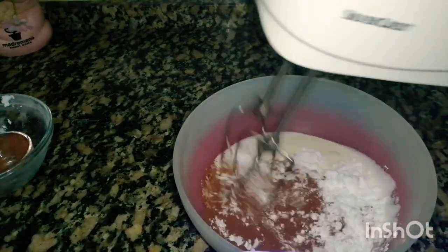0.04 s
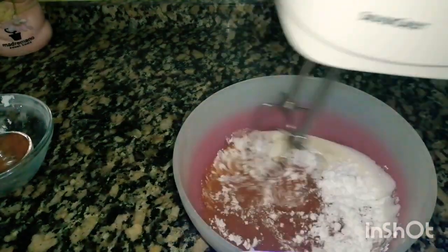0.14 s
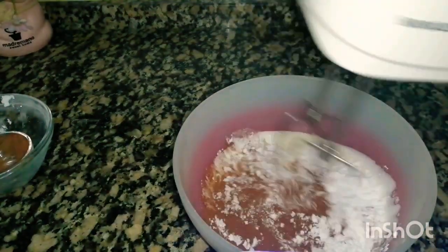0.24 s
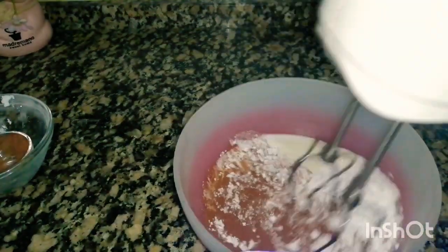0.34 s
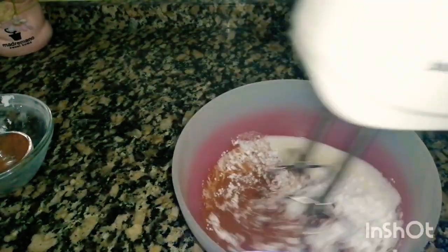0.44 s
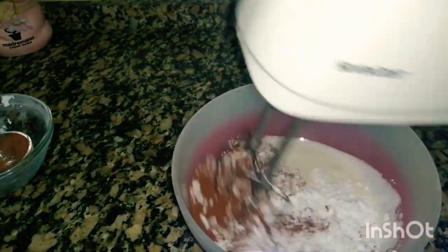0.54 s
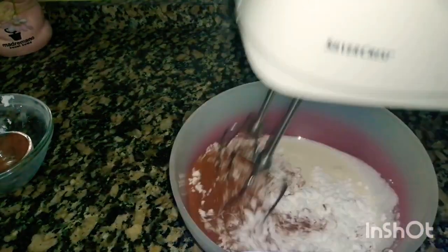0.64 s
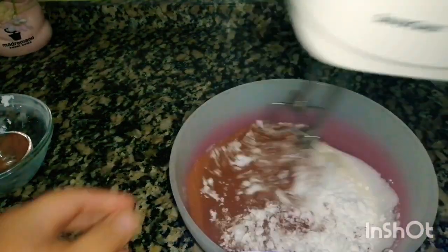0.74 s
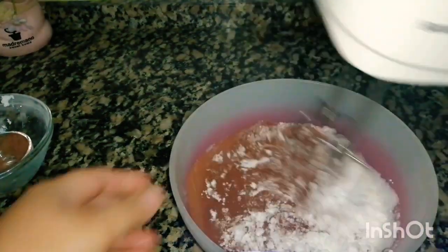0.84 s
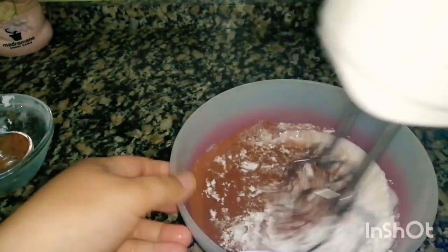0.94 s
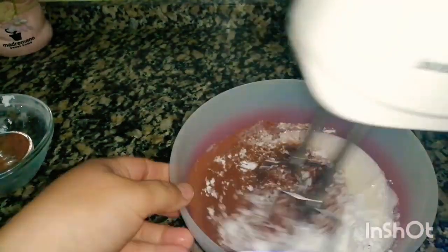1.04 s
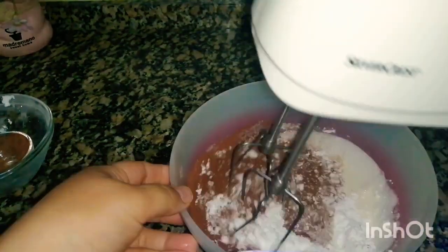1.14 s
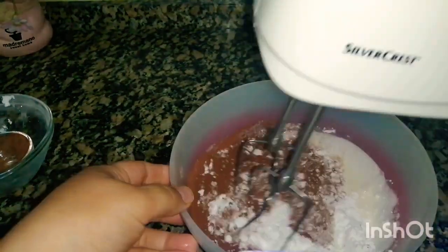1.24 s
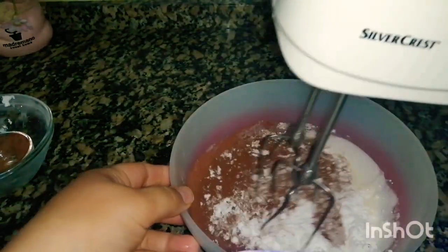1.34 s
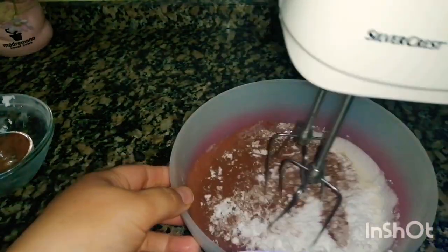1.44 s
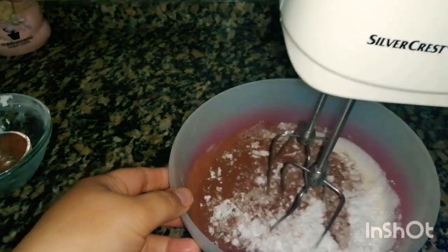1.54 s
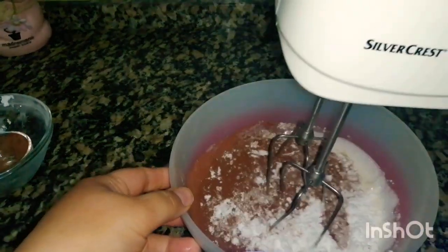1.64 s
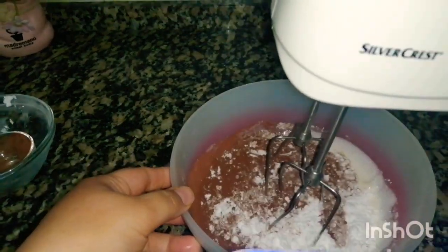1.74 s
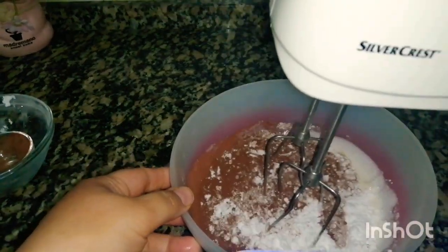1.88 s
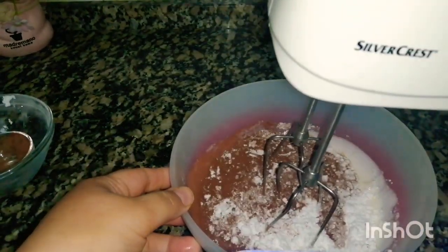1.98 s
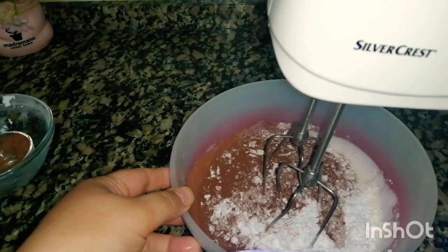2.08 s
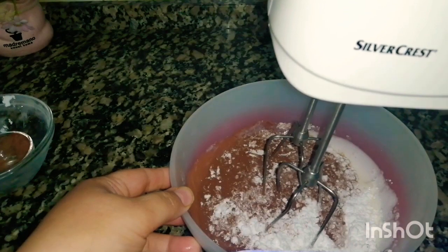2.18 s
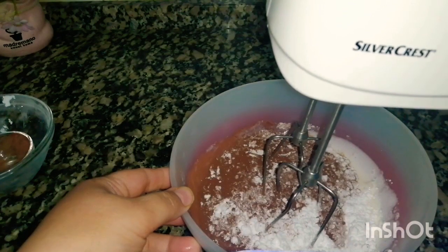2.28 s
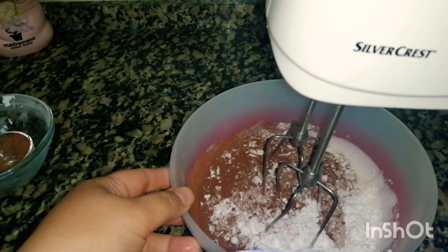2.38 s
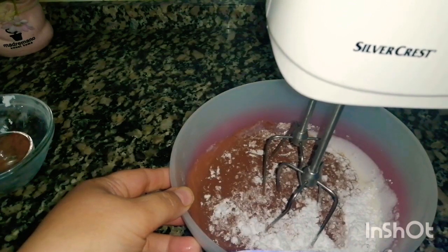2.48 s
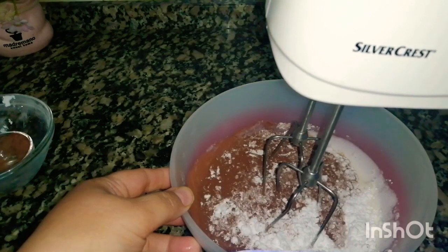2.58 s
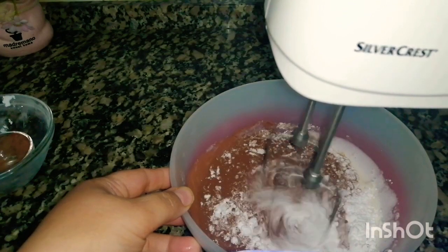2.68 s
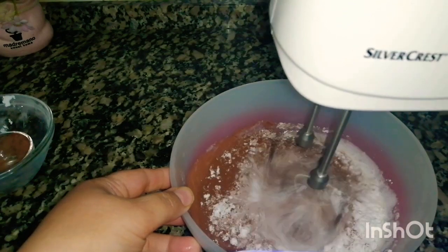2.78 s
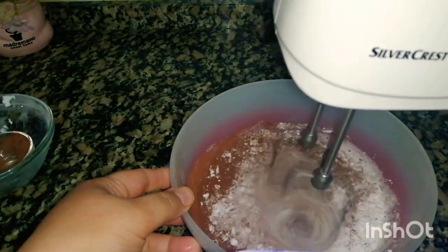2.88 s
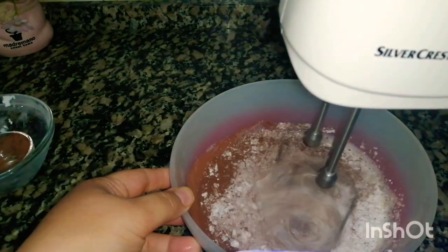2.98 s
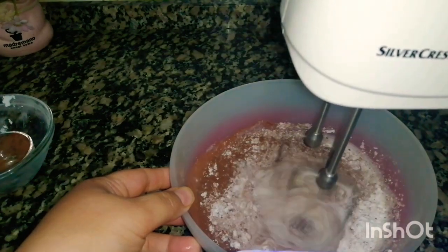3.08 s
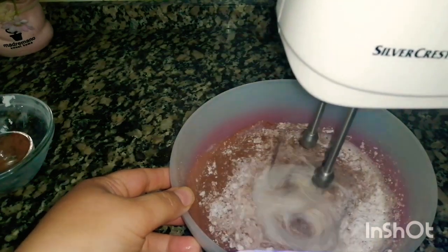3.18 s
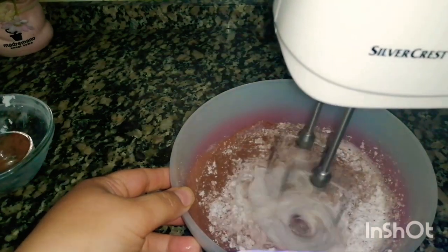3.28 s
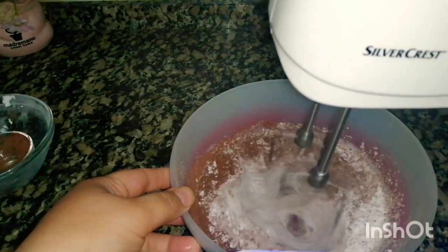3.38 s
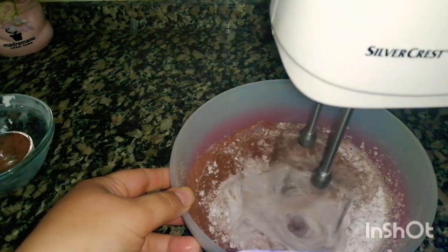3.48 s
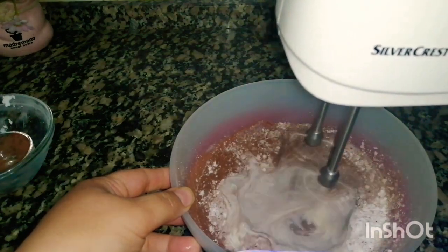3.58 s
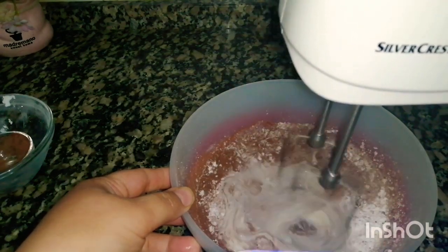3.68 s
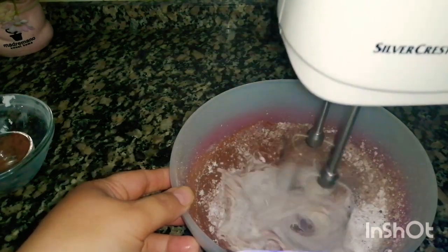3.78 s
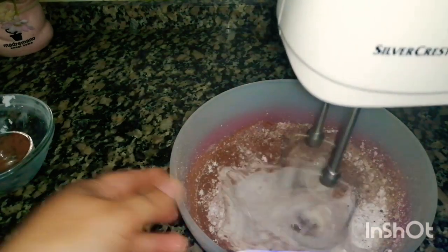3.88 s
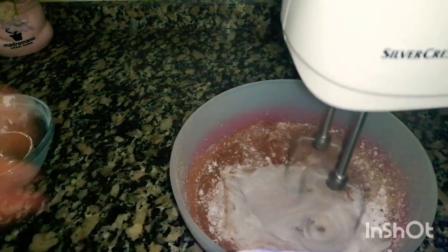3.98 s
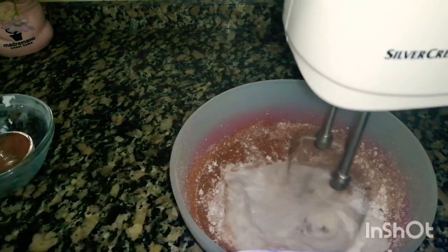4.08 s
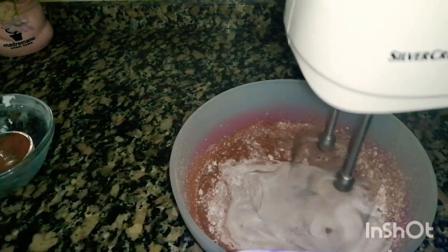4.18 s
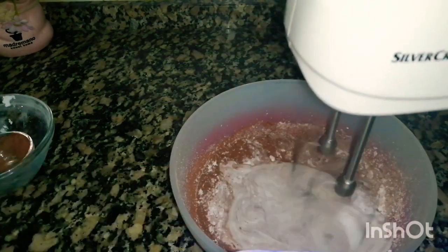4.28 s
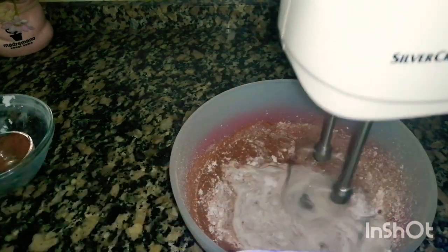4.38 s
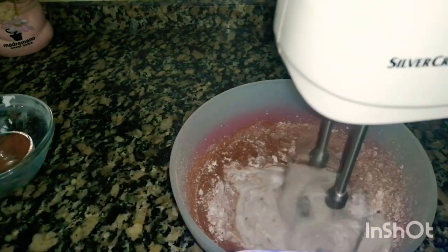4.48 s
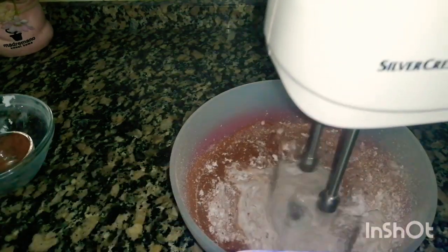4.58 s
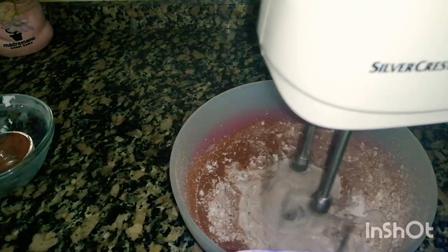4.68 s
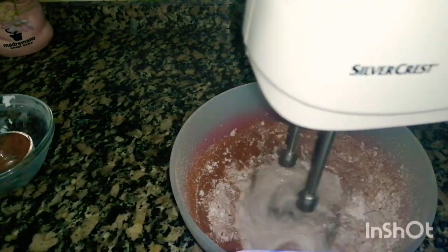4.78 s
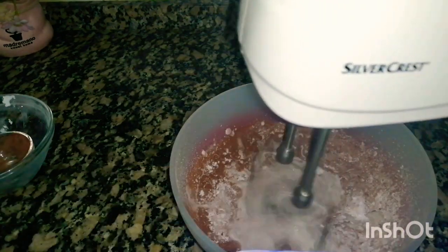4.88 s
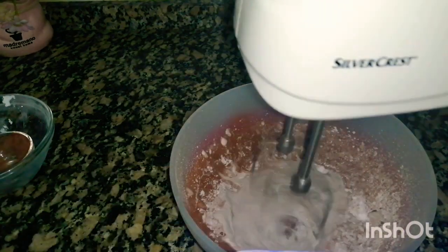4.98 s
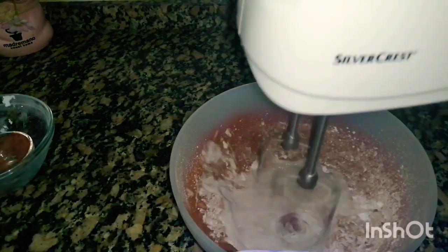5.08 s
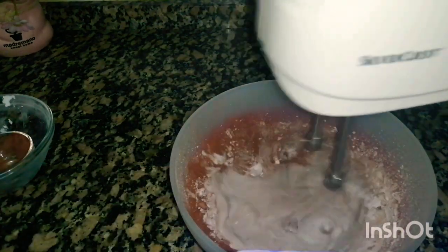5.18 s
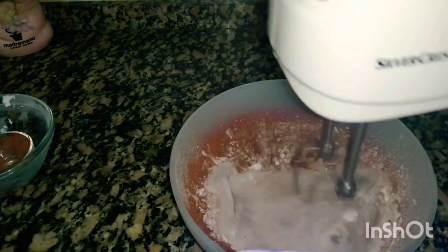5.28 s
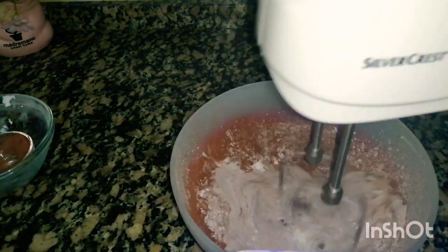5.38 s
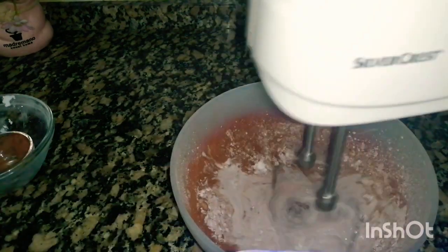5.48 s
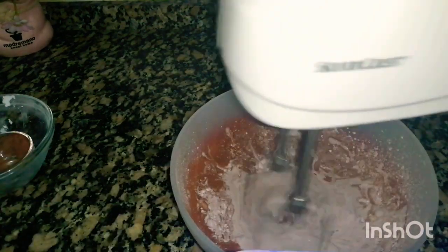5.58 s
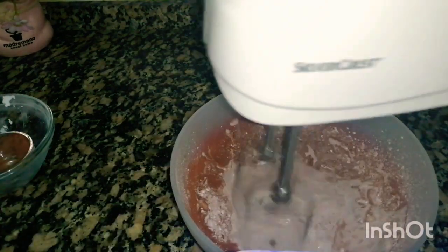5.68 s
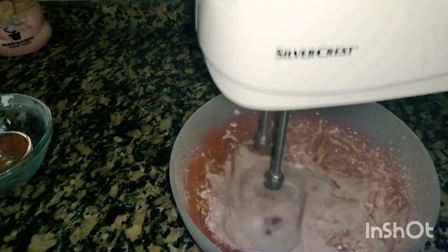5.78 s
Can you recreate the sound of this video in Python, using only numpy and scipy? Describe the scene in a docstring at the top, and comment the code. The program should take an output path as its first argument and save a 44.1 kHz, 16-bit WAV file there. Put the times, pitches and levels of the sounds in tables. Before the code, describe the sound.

After light scrapes and knocks against a bowl, a hand mixer starts with a rising whine and runs, rattling and hissing through cream.

```python
"""Hand mixer whipping cream

In a small kitchen, idle beaters are stirred through cocoa and powdered sugar and knock on a plastic
bowl. The switch clicks and the electric motor whines up to speed: its gears rattle, the beaters hiss
through the cream and fling it at the wall, and the bowl bumps on the counter. The left microphone
opening is muffled, and only that side picks up the deep shaking of the counter."""
import sys
import numpy as np
from scipy import signal
from scipy.fft import rfft, irfft, next_fast_len
from scipy.io import wavfile

SR = 44100
rng = np.random.default_rng(int(sys.argv[2]) if len(sys.argv) > 2 else 0)


def generate_wav(signal):
    """Clip the signal to [-1, 1] and save it as 16-bit WAV at the path in sys.argv[1]."""
    frames = np.transpose(np.atleast_2d(signal))
    scaled = np.clip(frames, -1, 1) * 32767
    pcm = np.round(scaled).astype(np.int16)
    wavfile.write(sys.argv[1], SR, pcm)


N = 257103
TIME = np.arange(N) / SR
FFT_SIZE = next_fast_len(N + SR, real=True)
FREQS = np.maximum(np.arange(FFT_SIZE // 2 + 1) * SR / FFT_SIZE, 1)

# Levels in the tables are relative: each sound is scaled again when it is mixed.
# tones of the rotor, the motor's spinning part (multiple of its speed, level [dB])
ROTOR_TONES = [(2, -12.5), (3, 0.3), (4, -10), (5, -5.5), (6, -9.5), (8, -5), (9, -2), (22, -24), (27, -2)]
POLE_TONES = [(2, 0.5), (4, -14), (5, -13.5), (6, -12.5)]   # buzz of the two magnetic poles
BRUSH_TONES = [(24, 0), (48, -1), (72, -3)]   # brushes sliding over 24 contact bars
# hum of the unbalanced rotor (speed [turns/s], level [dB])
UNBALANCE_HUM = [(100, -71), (150, -54), (200, -37), (268, -22), (367, -25)]
# tone colours: how strong each pitch is (frequency [Hz], level [dB])
SHELL_COLOUR = [(100, -17.5), (140, -20.5), (220, -15.5), (310, 1), (520, -2), (720, -5.5), (1000, -0.8),
                (2300, -5), (3200, -1), (4000, -13), (5400, -2.5), (6800, -1.5), (8000, -15.5),
                (11000, -19.5), (15000, -10.5), (15600, -8.5)]   # the mixer's outer case
FRAME_COLOUR = [(700, -40), (1800, -47), (3300, -45), (4200, -58), (5500, -37), (6800, -39), (7500, -48),
                (8000, -52), (9000, -48), (9600, -42), (13000, -42), (15000, -44)]   # the motor's frame
BOWL_COLOUR = [(35, -36), (60, -9), (149, 1), (238, -5), (437, -6), (882, -8.5), (1010, -11), (1310, -8.5),
               (2050, -20), (3270, -5), (3940, -16.5), (6000, -4.5), (7940, -21), (14900, -36),
               (16000, -13)]   # the knocked bowl
POWDER_COLOUR = [(35, -17), (60, -24), (81, -1.5), (408, 6.5), (1010, -5.5), (1510, -9), (1660, -12),
                 (2580, -5.5), (4030, -14.5), (6430, -4), (8710, -23), (14900, -20.5), (16000, -23)]   # stirred powder
BUMP_COLOUR = [(50, -26), (95, 0.5), (130, -2), (190, -2.5), (280, -14), (600, -35), (2000, -70)]   # bowl on counter
SLOP_COLOUR = [(150, -25), (350, -4), (520, -0.5), (900, -8), (2000, -17), (8000, -40)]   # flung cream
ROOM_COLOUR = [(12, -28), (20, 2.5), (58, -18), (127, -19), (177, -22.5), (301, -18.5), (849, -31.5),
               (3840, -42.5), (5230, -39.5), (7730, -46), (12400, -49), (14700, -29), (16000, -40)]   # the still kitchen
MUFFLED_COLOUR = [(60, -17.5), (130, 5), (200, -4.5), (300, -10), (550, -13), (750, -3), (1100, 1),
                  (1400, -13.5), (2400, -18.5), (3000, -15.5), (4000, -22.5), (4600, -30), (6500, -48.5),
                  (15000, -38)]   # the left side compared with the right
GROWL_COLOUR = [(200, -22), (400, -10.5), (470, -5), (580, 3.0), (700, -22), (1500, -28)]
RUMBLE_COLOUR = [(12, -28), (28, 3.0), (40, -11), (50, -11), (63, -20), (90, -16), (200, -63),
                 (1000, -106)]
# resonances: narrow bands that a part boosts or weakens (frequency [Hz], width [Hz], boost [dB])
SHELL_RESONANCES = [(304.3, 21.6, 9.5), (484, 130, 6), (563.8, 13.3, 11.5), (820, 80, 4.5), (901, 30, 5),
                    (1292, 36, 2), (1836, 85, 1.5), (3050, 60, -3), (3200, 47, 5), (5320, 80, 3.5)]
FRAME_RESONANCES = [(1400, 280, 19), (2200, 220, 11), (2670, 320, 16.8), (3100, 420, 17.6), (4700, 200, 12),
                    (5610, 260, 13), (6440, 240, 14.3)]
HUM_RESONANCES = [(307.4, 19, 9.5), (318.2, 3.9, -5), (327, 10, 4.5), (337.5, 7.7, -7.5)]
BOWL_RESONANCES = [(312, 18, 11.2), (447, 100, 6.3), (568, 21, 8.4), (866, 23, 7.3), (1350, 160, 2.7),
                   (1900, 100, 4.6), (2615, 57, 5.3), (3290, 54, 5.5), (4560, 110, 5.2), (5320, 150, 6.1)]
# ringing of the wire beaters and their mount (frequency [Hz], level [dB], time to fade 60 dB [s])
BEATER_NOTES = [(322, 1, 0.35), (530, -6, 0.48), (2230, 6, 0.13), (2670, -8, 0.7), (2950, -12, 0.43),
                (3400, -2, 0.25), (4560, -25, 0.26), (5050, -46, 0.17), (5200, -4, 0.3), (6153, -30, 0.56)]
# sharp hits (time [s], level [dB], treble over bass [dB])
SWITCH_CLACKS = [(2.709, -22, 7.5), (2.729, -19, -19), (2.743, -9.5, 4), (2.754, -18.5, -15)]   # the switch, then the loose gears catching
BOWL_KNOCKS = [(0.198, -28, -10), (0.212, -30, 7.5), (0.219, -38, -18), (0.257, -34, -12), (0.366, -43, 7),
               (0.46, -39, -10), (0.473, -37, -21), (0.55, -43, 9), (0.636, -59, 0), (0.72, -34.5, 2),
               (0.847, -37, 7), (0.852, -32.5, 2), (1.057, -40.5, 18), (1.263, -28.5, 10),
               (1.269, -26.5, -2), (1.55, -49, 3), (1.611, -54.5, 0), (1.804, -60, 2), (1.98, -62, 8),
               (3.43, -28, -7)]   # beaters against the bowl
# strokes through the powder (time [s], length [s], crunch [dB], rubbing [dB], counter thump [dB])
POWDER_STROKES = [(0.0, .055, -68, -54.5, -63), (0.197, .08, -50.5, -40, -63), (0.31, .06, -53.5, -54, -64),
                  (0.457, 0.044, -57, -48.5, -58), (0.497, .03, -51, -53, -63), (0.533, .03, -47, -57, -70),
                  (0.634, 0.075, -43.3, -58, -57), (0.714, 0.081, -50, -46.5, -72),
                  (0.845, .05, -53.5, -53, -58), (1.054, 0.05, -43, -48, -60),
                  (1.259, .06, -55, -47.5, -53), (1.376, .07, -50, -58.5, -75),
                  (1.477, 0.13, -61.5, -59.5, -80), (1.98, .09, -73, -68.5, -72)]
# soft hits (time [s], level [dB])
BOWL_BUMPS = [(0.2, -55), (0.245, -54), (0.675, -55), (0.715, -53), (1.058, -53.5), (1.255, -56),
              (1.615, -65), (2.045, -58.5), (4.2, -40), (4.33, -42), (5.31, -47), (5.37, -38), (5.77, -44)]
CREAM_SLOPS = [(3.36, -27.5), (4.12, -26.5), (4.32, -27), (5.38, -28), (5.78, -30)]
# shaking of the counter under the whirling beaters (time [s], level [dB])
COUNTER_SHAKE = [(2.8, -91), (2.89, -66), (3.33, -52), (3.41, -66), (3.46, -55), (3.73, -53), (3.81, -41),
                 (4.41, -35.5), (5.1, -64), (5.32, -40), (5.5, -54), (5.61, -43.5), (5.83, -50)]

SWITCH_ON_S, MAINS_HZ, CUTOFF_HZ = 2.71, 50, 15700
GEAR_RATIO, ROTOR_SLOTS = 11.7, 12
# rotor speeds are in Hz, meaning turns per second
KICK_HZ, RACE_HZ, RACE_S = 20.3, 208.5, .177
CREEP_HZ, CREEP_S, CREEP_EASE = 138.3, 2.39, 1.706
# rattle, hiss and whistle grow with speed until they reach full strength
RATTLE_DB_PER_HZ, HISS_DB_PER_HZ, FULL_NOISE_HZ = .048, .075, 260
WHISTLE_DB_PER_HZ, FULL_WHISTLE_HZ = .2, 212
STROKE_RISE_S, STROKE_SAG_DB_PER_S, STROKE_FADE_DB_PER_S = 0.0074, 60, 192
ECHO_FADE_S = 0.51   # time to fade by 60 dB


def mixer():
    """Motor, gears and whisking sound through the shell; also returns the counter's shaking."""
    speed, age = rotor_speed(), since(SWITCH_ON_S)
    on = np.minimum(age / 0.016, 1)
    turns = np.cumsum(speed * (1 + .002 * drift(25))) / SR
    too_slow = np.maximum(FULL_NOISE_HZ - speed, 0)
    throb = np.cos(4 * np.pi * MAINS_HZ * TIME)   # the motor pulls twice per mains cycle
    strain = swell(SWITCH_ON_S, peak_s=0.03)   # the hard pull of starting up
    inside = motor_drone(speed, turns, throb, too_slow)
    outside = motor_whine(speed, turns, throb)
    inside += gears_and_whisking(turns, too_slow, strain) + starting_growl(age, strain, throb)
    clacks = from_db(-6.5) * blows(SWITCH_CLACKS, crack_s=0.0022, ring_s=0.01, ring_db=-22)
    shell = apply_filter(on * inside + clacks, unit_power(colour(SHELL_COLOUR, SHELL_RESONANCES)))
    slap, shake = whirling_beaters(turns / GEAR_RATIO)
    return shell + on * (outside + slap), on * shake


def rotor_speed():
    """Turns per second: the rotor jumps, races up, then creeps to top speed as the cream loosens."""
    age = since(SWITCH_ON_S)
    race = RACE_HZ * (1 - np.exp(-age / RACE_S))
    creep = CREEP_HZ * (1 - np.maximum(1 - age / CREEP_S, 0) ** CREEP_EASE)
    return KICK_HZ + race + creep


def motor_drone(speed, turns, throb, too_slow):
    """Inside the shell, the magnetic poles buzz and the spinning rotor drones."""
    current_db = -18 * np.clip((speed - 260) / 90, 0, 1)   # a fast motor draws less current
    buzz = from_db(current_db - 35.5) * np.clip(speed / 232, 0, 1) ** 5 * (1 + 0.82 * throb)
    buzz *= tones(POLE_TONES, turns, flutter=0.27, flutter_hz=24.7)
    drone = from_db(-35.6 - RATTLE_DB_PER_HZ * too_slow) * (speed / speed.max()) ** 3
    drone *= tones(ROTOR_TONES, turns, flutter=0.35, flutter_hz=45)
    return buzz + drone


def motor_whine(speed, turns, throb):
    """The unbalanced rotor hums, its slots whine and the brushes whistle; each flares at resonances."""
    def frame_gain(multiple):
        return from_db(level_at(multiple * speed, FRAME_COLOUR, FRAME_RESONANCES))

    hum = from_db(level_at(speed, UNBALANCE_HUM, HUM_RESONANCES)) * np.sin(2 * np.pi * turns)
    hum *= 1 + 0.14 * drift(19)
    whine = tones([(ROTOR_SLOTS, 0)], turns, flutter=.42, flutter_hz=65)
    whine *= frame_gain(ROTOR_SLOTS) * (1 + .85 * throb)
    whistle = sum(frame_gain(multiple) * tones([(multiple, db)], turns, flutter=0.27, flutter_hz=45)
                  for multiple, db in BRUSH_TONES)
    whistle *= (1 + 0.2 * throb) * from_db(-WHISTLE_DB_PER_HZ * np.maximum(FULL_WHISTLE_HZ - speed, 0))
    return hum + whine + whistle


def gears_and_whisking(turns, too_slow, strain):
    """Loose gears rattle, and grind at the start, while the whisked cream hisses."""
    chatter = 1 + 0.13 * np.cos(2 * np.pi * turns)   # once per rotor turn
    slaps = 1 + 0.031 * np.cos(4 * 2 * np.pi * turns / GEAR_RATIO)   # four per beater turn
    flicker = from_db(0.98 * drift(48) + 0.26 * drift(7))
    rattle = lows(grains(per_s=9000, spread_db=1.5), hz=2470)
    rattle *= from_db(-23.6 - RATTLE_DB_PER_HZ * too_slow) + from_db(-38) * strain
    hiss = highs(grains(per_s=25000, spread_db=3.0), hz=2430)
    hiss *= from_db(-22.3 - HISS_DB_PER_HZ * too_slow + .5 * drift(71))
    return chatter * slaps * flicker * (rattle + hiss)


def starting_growl(age, strain, throb):
    """The starting surge makes the shell growl, pulsing with the mains."""
    surge = (from_db(-18.5) * np.exp(-age / 0.75) + from_db(-14) * strain) * (1 + 0.42 * throb)
    return surge * apply_filter(rng.standard_normal(N), colour(GROWL_COLOUR))


def whirling_beaters(beater_turns):
    """Returns the low tones of blades slapping cream, and the deep shaking of the counter."""
    shake_db = np.interp(TIME, *np.transpose(COUNTER_SHAKE))
    slap = tones([(4, 2.5), (6, -1.5)], beater_turns, flutter=0.58, flutter_hz=24)
    shake = np.sin(2 * np.pi * beater_turns) + 0.34 * counter_rumble()
    return from_db(shake_db - 17.5) * slap, from_db(shake_db + 8.5) * shake


def stirring():
    """Idle beaters rub the bowl and crunch through powder; also returns the counter's late thumps."""
    crunch_gain = rub_gain = thump_gain = 0
    for start_s, length_s, crunch_db, rub_db, thump_db in POWDER_STROKES:
        age = since(start_s)
        # a stroke bites at once, weakens while it lasts, then dies away
        drop_db = STROKE_SAG_DB_PER_S * age + STROKE_FADE_DB_PER_S * since(start_s + length_s)
        push = np.minimum(age / STROKE_RISE_S, 1) * from_db(-drop_db)
        crunch_gain += from_db(crunch_db + 6.5) * push
        rub_gain += from_db(rub_db + 1) * push
        thump_gain += from_db(thump_db + 7) * swell(start_s, peak_s=0.073)
    powder = grains(per_s=2500, spread_db=2.7)
    drag = rub_gain * lows(powder, hz=1650) - crunch_gain * highs(powder, hz=1650)
    bowl = apply_filter(drag, unit_power(colour(POWDER_COLOUR, BOWL_RESONANCES)))
    return bowl, thump_gain * counter_rumble()


def beater_knocks():
    """The beaters hit the bowl: the plastic sounds, and the wire ticks and rings on."""
    knocks = highs(blows(BOWL_KNOCKS, crack_s=0.0028, ring_s=0.037, ring_db=-15.5), hz=210)
    bowl = apply_filter(knocks, unit_power(colour(BOWL_COLOUR, BOWL_RESONANCES)))
    tick = blows(BOWL_KNOCKS, crack_s=0.00067, ring_s=.004, ring_db=-22)
    return from_db(-0.5) * bowl + from_db(-39) * tick + from_db(-26) * wire_ring()


def wire_ring():
    """Each knock sets all the beaters' notes ringing, each with a slightly random strength."""
    out = np.zeros(N)
    starts = [round(knock[0] * SR) for knock in BOWL_KNOCKS]
    scatter_db = rng.normal(0, 1.4, (len(BOWL_KNOCKS), len(BEATER_NOTES)))
    strengths = from_db(np.array(BOWL_KNOCKS)[:, 1:2] + scatter_db)
    for (hz, db, fade_s), strength in zip(BEATER_NOTES, strengths.T):
        clicks = np.zeros(N) + 1e-18
        clicks[starts] = strength * from_db(db)
        decay, angle = np.exp(-np.log(1000) / (fade_s * SR)), 2 * np.pi * hz / SR
        # turns each click into a fading tone
        out += signal.lfilter([0, np.sin(angle)], [1, -2 * decay * np.cos(angle), decay ** 2], clicks)
    return out


def bumps_and_slops():
    """The jolted bowl bumps dully on the counter, and wet cream slops against its wall."""
    bumps = soft_hits(BOWL_BUMPS, BUMP_COLOUR, rng.standard_normal(N))
    return bumps + soft_hits(CREAM_SLOPS, SLOP_COLOUR, grains(per_s=1500, spread_db=2.5))


def counter_rumble():
    """Deep thudding noise carried by the counter."""
    return unit_power(apply_filter(rng.standard_normal(N), colour(RUMBLE_COLOUR)))


def kitchen_echo(x):
    """Dense early echoes from counter and tiles, then a short tail; weak in the bass."""
    age = TIME[:SR // 2]
    fade = np.exp(-np.log(1000) * age / ECHO_FADE_S) + 1.45 * np.exp(-age / 0.011)
    tail = rng.standard_normal(len(age)) * fade * (age > .001)
    return signal.fftconvolve(highs(x, hz=630), tail / np.sqrt(np.sum(tail ** 2)))[:N]


def room_noise():
    """The steady hush of the still kitchen, muffled on the left."""
    hush = apply_filter(rng.standard_normal((2, N)), unit_power(colour(ROOM_COLOUR)))
    hush[0] = apply_filter(hush[0], colour(MUFFLED_COLOUR))
    return hush


def tones(rows, turns, flutter, flutter_hz):
    """Tones at multiples of a turning speed, each fluttering in strength and phase."""
    out = np.zeros(N)
    for multiple, db in rows:
        wobble = 1 + flutter * (drift(flutter_hz) + 1j * drift(flutter_hz))
        out += from_db(db) * np.real(wobble * np.exp(2j * np.pi * multiple * turns))
    return out


def blows(rows, crack_s, ring_s, ring_db):
    """Each blow is a short crack of noise with a weaker tail and its own brightness."""
    out = np.zeros(N)
    age = TIME[:SR // 3]
    fade = np.exp(-age / crack_s) + from_db(ring_db) * np.exp(-age / ring_s)
    for start_s, db, treble_db in rows:
        burst = rng.standard_normal(len(age)) * fade
        tilt = from_db(treble_db / 2)
        blow = lows(burst, hz=1380) / tilt - highs(burst, hz=1380) * tilt
        start = round(start_s * SR)
        out[start:start + len(age)] += from_db(db) * blow
    return out


def soft_hits(rows, points, noise):
    """Each soft hit is a short swell of coloured noise."""
    swells = sum(from_db(db) * swell(start_s, peak_s=0.024) for start_s, db in rows)
    return swells * unit_power(apply_filter(noise, colour(points)))


def grains(per_s, spread_db):
    """Random clicks of uneven size."""
    sizes = from_db(spread_db * np.minimum(rng.exponential(1, N), 4)) * rng.choice([-1, 1], N)
    return unit_power(sizes * (rng.random(N) < per_s / SR))


def drift(rate_hz):
    """A smooth random wander of about 1 either way, mostly slower than the given rate."""
    count = N // 32 + 2
    hz = np.arange(count // 2 + 1) * SR / N
    slow = irfft(rfft(rng.standard_normal(count)) / (1 + (hz / rate_hz) ** 2), count)
    return np.interp(TIME, np.linspace(0, N / SR, count), unit_power(slow))


def swell(start_s, peak_s):
    """Rises to 1 in peak_s seconds, then dies away."""
    age = since(start_s) / peak_s
    return (age * np.exp(1 - age)) ** 3


def since(start_s):
    """Seconds since a moment, zero before it."""
    return np.maximum(TIME - start_s, 0)


def level_at(hz, points, resonances=()):
    """Level in dB at the given frequencies: a broad curve with resonances on top."""
    point_hz, point_db = np.transpose(points)
    peaks = sum(db / (1 + (2 * (hz - centre) / width) ** 2) for centre, width, db in resonances)
    return np.interp(np.log(hz), np.log(point_hz), point_db) + peaks


def colour(points, resonances=()):
    """Turns a tone colour into a gain for every frequency."""
    return from_db(level_at(FREQS, points, resonances))


def apply_filter(x, gain):
    """Scales each frequency by its gain; ringing comes only after a hit (minimum phase)."""
    cepstrum = irfft(np.log(gain + 1e-7), FFT_SIZE)
    cepstrum[1:FFT_SIZE // 2] *= 2
    cepstrum[FFT_SIZE // 2 + 1:] = 0
    return irfft(rfft(x, FFT_SIZE) * np.exp(rfft(cepstrum)), FFT_SIZE)[..., :N]


def lows(x, hz):
    """The part below a frequency."""
    return signal.sosfilt(signal.butter(2, hz, "low", fs=SR, output="sos"), x)


def highs(x, hz):
    """The part above a frequency."""
    return signal.sosfilt(signal.butter(2, hz, "high", fs=SR, output="sos"), x)


def from_db(db):
    """Decibels to gain."""
    return 10 ** (np.asarray(db) / 20)


def unit_power(x):
    """Scales to an average power of 1."""
    return x / np.sqrt(np.mean(x ** 2) + 1e-20)


def scene():
    """The left side hears it all later, duller and with more echo; only it feels the counter shake."""
    motor, shake = mixer()
    powder, thumps = stirring()
    air = motor + powder + beater_knocks() + bumps_and_slops()
    right = air + from_db(-9) * kitchen_echo(air)
    delayed = np.interp(TIME - .00018, TIME, air)
    # only the lows bend straight round to the left opening
    left = from_db(-1.5) * lows(delayed, hz=1600) + from_db(-4) * kitchen_echo(air)
    left = apply_filter(left, colour(MUFFLED_COLOUR))
    return np.array([left + shake + thumps, right]) + from_db(-63.5) * room_noise()


def record(dry):
    """Cuts off the highest treble steeply."""
    return signal.sosfilt(signal.ellip(10, .1, 80, CUTOFF_HZ, fs=SR, output="sos"), dry)


dry = scene()
out = record(dry)
generate_wav(out)
```